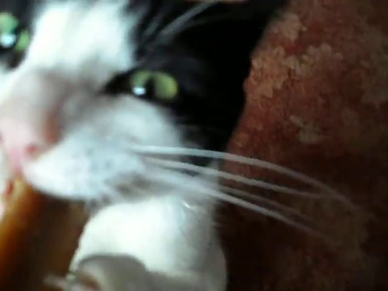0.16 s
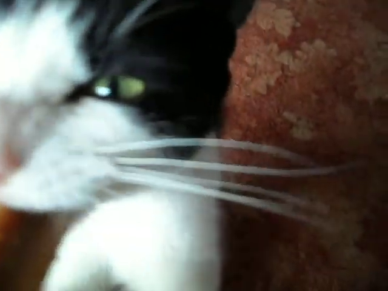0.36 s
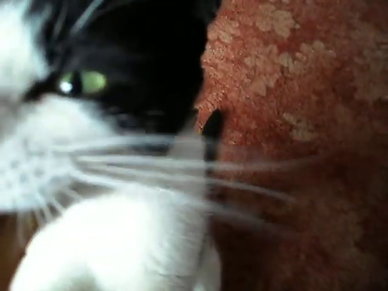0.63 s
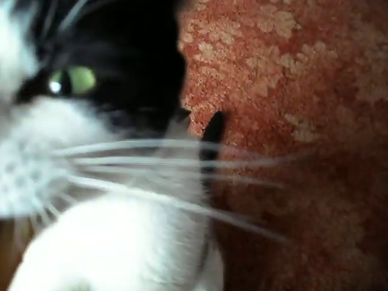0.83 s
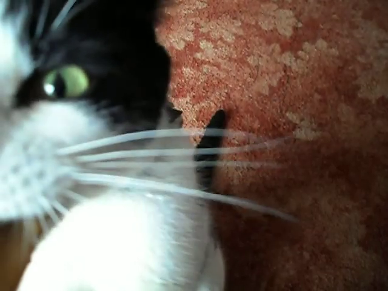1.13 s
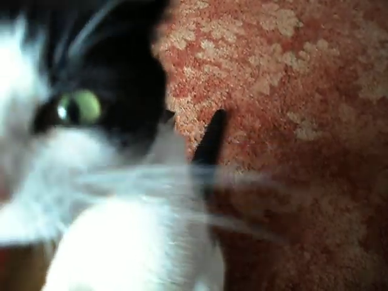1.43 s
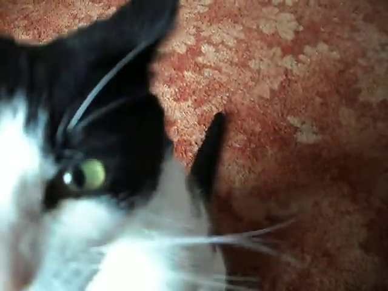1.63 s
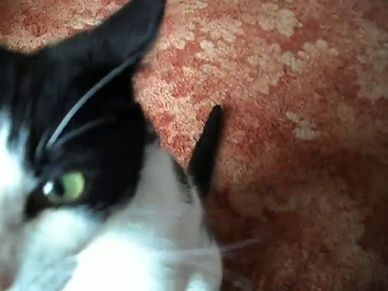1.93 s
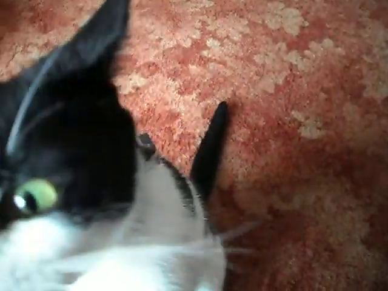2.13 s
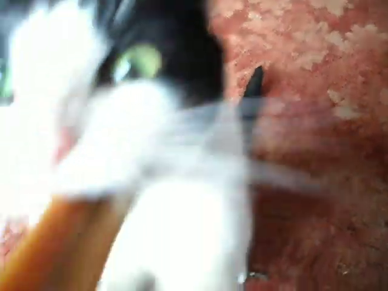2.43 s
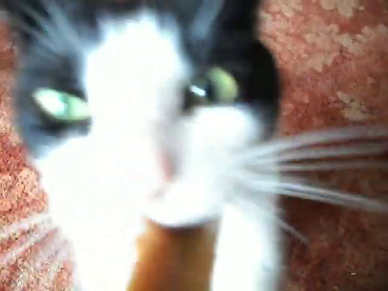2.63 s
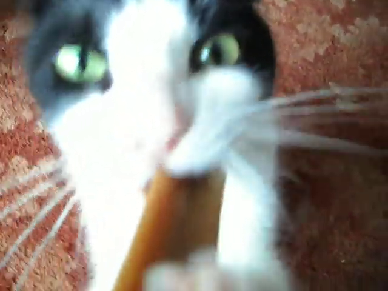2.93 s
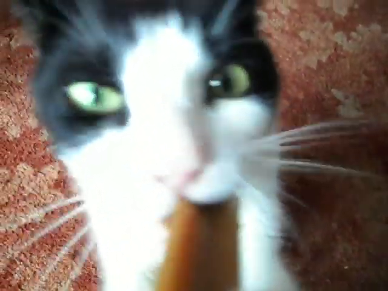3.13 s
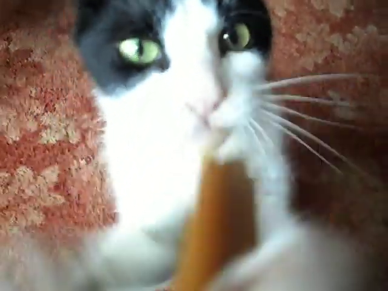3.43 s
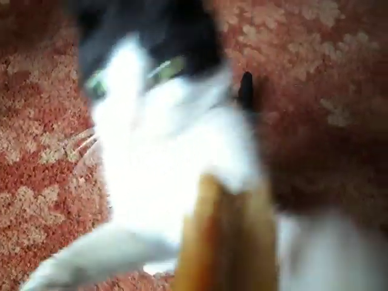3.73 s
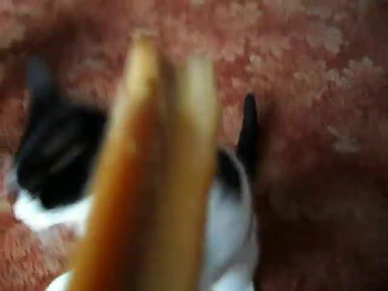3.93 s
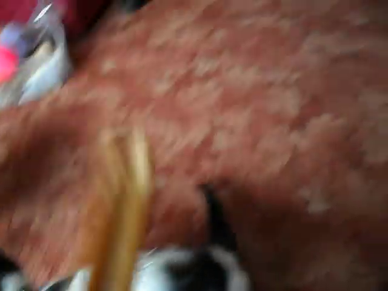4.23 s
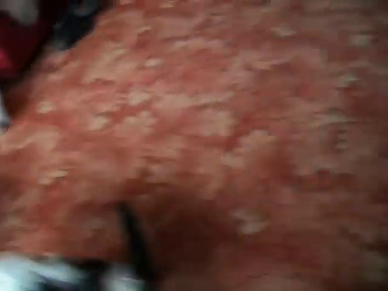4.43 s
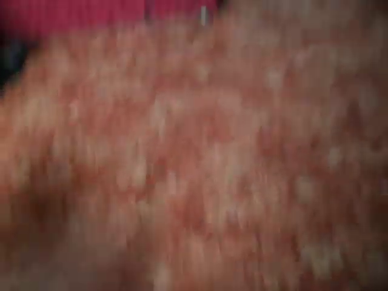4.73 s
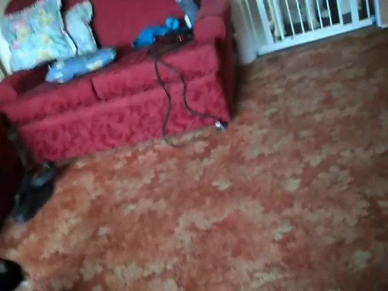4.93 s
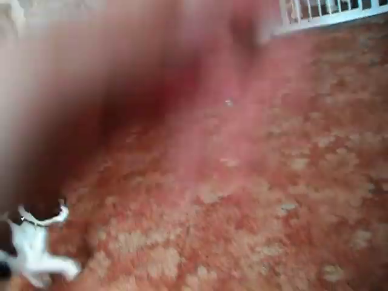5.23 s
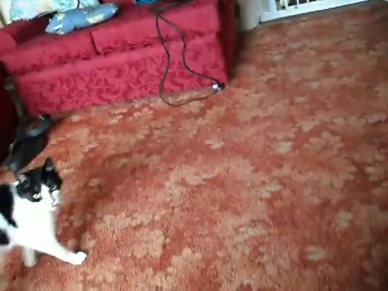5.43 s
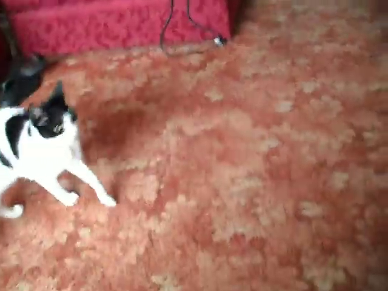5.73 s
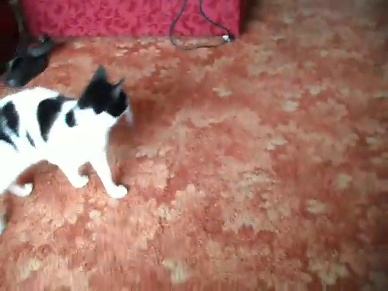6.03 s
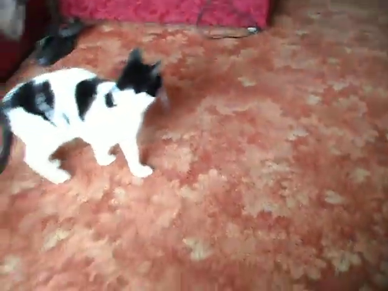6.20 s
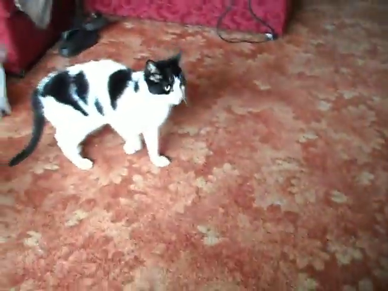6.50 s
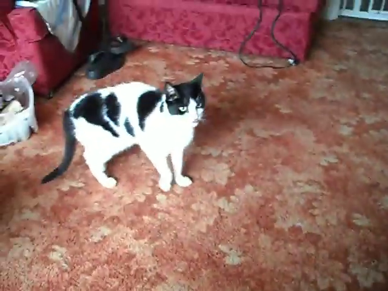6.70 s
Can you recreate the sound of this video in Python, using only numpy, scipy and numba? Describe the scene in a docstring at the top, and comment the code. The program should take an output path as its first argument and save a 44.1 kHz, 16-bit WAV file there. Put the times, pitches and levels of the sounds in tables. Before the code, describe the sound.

A rough, pulsing cat growl opens right at the microphone, ending in a brief higher catch and faint wet smacks. Knocks and tiny tooth ticks lead to a second, smoother growl, cut off by a single explosive yelp ringing in the small room. Afterwards there is hissy quiet, soft rubbing, a dropped chew and several loud, dry clicks.

```python
"""A pet growls low over a hard chew close to a camera in a room, then barks once: vocal-fold pulses
through chest, mouth and throat resonances. Teeth and claws tick as short rings; a tag, wet smacks and
the dropped chew ring as modes. Knocks, rubs, rustle and whistles are shaped noise.
The camera hisses, whines, buzzes at its frame rate, and turns its gain down after loud sounds."""
import sys
import numpy as np
from scipy import signal
from scipy.fft import rfft, irfft
from scipy.io import wavfile
from scipy.ndimage import uniform_filter1d
from numba import njit

SR = 44100
rng = np.random.default_rng(int(sys.argv[2]) if len(sys.argv) > 2 else 0)


def pcm_store(signal):
    """Save signal as 16-bit PCM."""
    levels = np.round(np.clip(np.atleast_2d(signal), -1, 1) * 32767)
    wavfile.write(sys.argv[1], SR, levels.astype(np.int16).T)


N = 302476
T = np.arange(N) / SR

# growls: (start [s], end [s], swell-in [s], resting pulse rate [Hz], chest level at rest [dB],
#   chest rise with push [dB/Hz], mouth ring at rest [dB], its fade [dB/s],
#   mouth resonance at start [Hz], upper throat [dB], throb [dB])
GROWLS = [(0, 0.737, .01, 86, -51, 0, -51.5, 4.5, 1013, -5, 9),
          (0.736, 0.776, .01, 164.9, -38.5, 2.5, -64, 0, 860, -6, 0),
          (1.702, 3.384, 0.14, 98.3, -49, 0.69, -55.5, 0, 898, 1, 3.5)]
# pulse rate, one list per growl: (time [s], rate [Hz])
GROWL_RATES = [
    [(0, 76.55), (.142, 81.9), (.3, 83.9), (.414, 81.8), (.508, 73.83), (.73, 80.3)],
    [(.727, 169), (.772, 156.3)],
    [(1.7, 97.8), (1.8, 100.6), (2.022, 97.4), (2.15, 111.7), (2.24, 114.3), (2.33, 107.9), (2.45, 96.4),
     (2.602, 107.2), (2.8, 93.36), (2.912, 112.8), (2.982, 103.2), (3.054, 98.5), (3.172, 107.4),
     (3.25, 99.96), (3.37, 96.6)],
]
# scatter of period, one per growl: (spread [natural log])
GROWL_ROUGHNESS = [.12, .05, .055]
# chest resonances: (centre [Hz], width [Hz], level [dB])
CHEST = [(112, 130, 7.5), (264, 320, -1)]
# upper throat: (centre [Hz], width [Hz], level re mouth ring [dB], share of the opening [1])
UPPER_THROAT = [(2120, 290, -10, 0.4), (3746, 160, -16.5, 0.45)]
# bark: (time [s], pitch [Hz], level [dB], first partial re level [dB])
BARK = [(3.374, 189.9, -54.5, -8), (3.388, 214.6, -32, -3), (3.402, 345, -25.5, 0), (3.425, 427, -18, 4),
        (3.437, 437.5, -6, 7), (3.45, 442, -15.5, -5), (3.468, 450, -12, -17.5), (3.49, 455, -15, 8),
        (3.503, 440, -27, 2), (3.525, 330, -29, -6), (3.555, 234.8, -31, -6.5), (3.6, 185, -34.5, 0),
        (3.65, 167.4, -56, 8)]
# bark resonances with the jaw open: (centre [Hz], width [Hz], level [dB])
BARK_THROAT = [(640, 90, -14), (878, 253, -1), (1230, 220, -8), (1720, 200, -15), (2200, 490, -18.5),
               (2510, 220, -18)]
# steady breath bands in the bark: (centre [Hz], width [Hz], level [dB])
BARK_BREATH = [(3700, 500, -32), (4870, 248, -32), (5670, 300, -27.5), (7430, 330, -27.5),
               (9300, 2000, -28)]
# knocks across the room: (time [s], treble peak [dB], bass, middle, top re treble [dB])
KNOCKS = [(1.189, -33, -1.5, -4, -2.5), (1.324, -36, -4, -5, -8), (1.4844, -42.5, -22, -8, 6),
          (1.596, -36.5, -13, -18, 3), (1.68, -48, -2, 6, 8.5), (1.8312, -34, -13, -2, -1),
          (1.8495, -36, -29, 6, 6), (2.405, -36, -14, -2.5, 5), (5.5646, -34, 1, 2, 11),
          (5.971, -44, 9.5, 8, 4.5)]
# knock bands, bass to top: (centre [Hz], width [Hz])
KNOCK_BANDS = [(860, 750), (2600, 5300), (5300, 3100), (9300, 5200)]
# close clicks: (time [s], peak [dB], main ring [Hz], second ring [Hz], its level [dB], rattle [dB])
CLICKS = [(3.27, -42, 2120, 4960, -10, -20), (3.3075, -31.5, 2170, 6200, -10, 0),
          (3.3593, -40.5, 2180, 6750, 0, -4), (6.2987, -18, 4000, 8800, -5, -3),
          (6.6144, -16, 4930, 2550, -18, -19), (6.6269, -6.5, 4700, 1670, -23.5, -33),
          (6.6613, -15, 3770, 2400, -3, -0.5), (6.8285, -1, 4630, 2760, -6.5, -20)]
# ticks of claws and nails: (time [s], peak [dB], ring [Hz])
TICKS = [(.023, -35, 8000), (.298, -46, 3500), (1.437, -38.5, 7500), (1.485, -34, 8500), (1.597, -28, 6040),
         (3.236, -28, 4500), (3.943, -32.5, 5760), (6.202, -27, 8300), (6.412, -28, 7400),
         (6.439, -29.5, 7560), (6.68, -38, 6500)]
# low thumps: (time [s], peak [dB])
THUMPS = [(.739, -31), (3.433, -23.5), (6.2977, -20)]
# rubbing of fur and fingers: (full from [s], held [s], level [dB], low band [Hz],
#   upper bands re level [dB], swell [dB/s], fade [dB/s])
RUBS = [(.43, .005, -66.5, 7000, 4, 397, 300), (.662, 0.024, -65, 5000, 4.5, 600, 150),
        (.865, 0.012, -54.5, 3240, 2.5, 120, 96), (.91, 0.035, -54.5, 950, -34, 198, 150),
        (3.0, 0.058, -54.5, 3000, 1, 400, 199), (5.582, 0.012, -54, 2920, 5, 600, 78),
        (5.99, 0.033, -58.5, 1220, 0, 500, 40), (6.2, 0.045, -48.5, 4100, 7, 174, 396),
        (6.26, 0.06, -48.5, 3930, -2, 300, 500), (6.365, 0.017, -53, 4400, 1, 297, 300)]
# rustle of the room and the moving hand: (time [s], level [dB])
RUSTLE = [(0, -52), (.9, -53), (1.47, -53.5), (2.27, -49), (3.4, -48), (3.7, -57), (4.5, -58), (4.65, -50),
          (5.5, -57), (6.0, -49.5), (6.5, -50), (6.57, -45), (6.65, -50), (6.86, -52)]
# rustle spectrum: (frequency [Hz], density [dB per Hz])
RUSTLE_COLOUR = [(40, 6.5), (100, 3.5), (200, 1.5), (400, -6.5), (800, -12.5), (1600, -20.5), (3500, -26.5),
                 (6000, -36)]
# camera hiss spectrum: (frequency [Hz], density [dB per Hz])
HISS_COLOUR = [(180, -32.5), (300, -5.5), (2740, -11.5), (3400, -12), (6760, -14.5), (7600, -12),
               (9600, -9.5), (10800, -10.5), (11600, -18), (12400, -24.5)]
# camera buzz: (multiple of frame rate [1], level [dB])
BUZZ = [(1, -46.5), (2, -59.5), (3, -71), (4, -63.5)]
# collar tag modes: (frequency [Hz], level [dB], T60 [s])
TAG = [(615, -11, 0.65), (1020, -4, 0.36), (1980, -6.5, 0.46), (2774, -1, 0.42), (3560, 1, 0.32),
       (3700, 2, .15), (4200, 0, 0.2), (4420, -2.5, 0.34), (5610, -3, .15), (6560, -4, 0.26),
       (9030, -3, 0.22), (10120, 11.5, 0.077)]
# modes of the chew dropped on the floor: (frequency [Hz], level [dB], T60 [s])
CHEW = [(242, -1, 0.31), (330, -13, 0.2), (634, -4, .22), (730, 3, 0.27), (1130, -8, 0.2), (1460, -10, 0.2),
        (2250, -14, .2), (3000, -16, 0.21)]
# wet smack modes: (frequency [Hz], level [dB], T60 [s])
SMACK = [(4900, -0.5, 0.26), (5100, -2, .2), (5560, -1, .2), (5700, -6, .15)]
# smacks: (time [s], level [dB])
SMACKS = [(.765, -49), (.837, -50)]
# whistles and squeaks: (start [s], length [s], pitch [Hz], glide [Hz/s], level [dB])
WHISTLES = [(0.635, 0.039, 3120, 0, -67), (0.683, .03, 3170, -1000, -65), (0.97, 0.036, 2450, 0, -58),
            (1.673, 0.092, 3250, -600, -65), (3.803, 0.097, 2260, 2500, -65),
            (3.797, 0.108, 873, 1499, -58), (4.291, .08, 3300, -1800, -61.5),
            (5.445, 0.13, 3290, -2500, -62.5), (6.687, 0.11, 2650, 1006, -63.5),
            (6.835, .03, 4470, -1.5, -60)]

MOUTH_WIDTH_HZ, MOUTH_LAG_S, MOUTH_DB_PER_HZ = 260., .0025, 0.44
MOUTH_SETTLE_HZ, MOUTH_SETTLE_S = 850, 1.0  # the resonance sinks as the jaw closes
OPENING_PER_HZ = .008  # resonances rise by this share per Hz of push
GROWL_WAVER_DB, MOUTH_WAVER_DB, THROAT_WAVER_DB = 1.0, .8, 2.0
STRONG_WEAK, PULSE_SCATTER_DB, THROAT_WANDER = .2, 2.0, .03
THROB_HZ, THROB_LEAD_TURNS = 19.9, 0.018
BARK_ROUGHNESS, OPEN_PITCH_HZ, OCTAVE_DB = .06, 425, -18
KNOCK_T60_S, KNOCK_CREST_DB = 0.28, 12  # noise peaks above rms
RING_RISE_S = 0.0052
TAG_S, TAG_DB, CHEW_S, CHEW_DB = 1.85, -43.5, 5.567, -32
TICK_WIDTH_HZ, TICK_RATTLE_DB = 2900, -16.5
CLICK_WIDTH_AT_4500_HZ, CLICK_WIDENING = 1330, 1  # width grows as this power of pitch
CLICK_TAIL_DB, CLICK_TAIL_T60_S = -18, .025
BODY_HZ, BODY_DB, BODY_T60_S = 905, -23, 0.012
THUMP_HZ, THUMP_T60_S = 119.9, 0.025
RUSTLE_FLICKER_DB, WHISTLE_WIDTH_HZ = 1.6, 125.
FRAME_HZ, BUZZ_WAVER_DB = 30, 2.2
HISS_DB, WHINE_HZ, WHINE_DB = -58.5, 7140, -68.5
ROOM_T60_S, ROOM_TOP_T60_S = 0.31, 0.24
TOP_HZ = 16500


def undb(db):
    """Gain of a level in dB."""
    return 10 ** (np.asarray(db) / 20)


def unit(x):
    """Scaled to rms 1."""
    return x / np.sqrt(np.mean(x ** 2))


def white():
    """White noise over the whole scene."""
    return rng.standard_normal(N)


def span(start_s, end_s):
    """Gate with soft edges."""
    return uniform_filter1d(1. * ((T >= start_s) & (T <= end_s)), 600)


def columns(rows):
    """Gate over a table's time span, and its columns at every sample."""
    time_s, *cols = np.transpose(rows)
    return span(time_s[0], time_s[-1]), [np.interp(T, time_s, c) for c in cols]


def walk(rate_hz):
    """Slow chance with spread 1."""
    k = int(SR / rate_hz)
    steps = np.repeat(rng.standard_normal(N // k + 1), k)
    return unit(uniform_filter1d(uniform_filter1d(steps, k), k)[:N])


def fade(start_s, t60_s):
    """Envelope from start_s, down 60 dB after t60_s."""
    return (T >= start_s) * np.exp(-np.log(1000) * np.clip(T - start_s, 0, 2) / max(t60_s, .001))


def coloured(points):
    """Noise with the spectrum of (Hz, dB) points, rms 1."""
    hz, db = np.transpose(points)
    f = np.maximum(np.arange(N // 2 + 1) * SR / N, 1)
    shape_db = np.interp(np.log(f), np.log(hz), db, left=-90, right=-90)
    return unit(irfft(rfft(white()) * undb(shape_db), N))


def band(x, hz, width_hz):
    """Fixed band-pass."""
    return signal.lfilter(*signal.iirpeak(hz, hz / max(width_hz, 1), SR), x)


def steep_band(x, hz, outer_hz, inner_hz):
    """Two fixed band-passes in series."""
    return band(band(x, hz, outer_hz), hz, inner_hz)


@njit
def svf(x, hz, width):
    """Band-pass with a moving centre, gain 1 at the centre."""
    y, b, l = np.empty(len(x)), 0., 0.
    for i in range(len(x)):
        g, k = np.tan(np.pi * hz[i] / SR), width / hz[i]
        v = (b + g * (x[i] + 1e-18 - l)) / (1 + g * (g + k))
        b, l, y[i] = 2 * v - b, l + 2 * g * v, k * v
    return y


def resonance(x, centre_hz, outer_hz, inner_hz):
    """Moving resonance of two band-passes, rms 1."""
    return unit(svf(svf(x, centre_hz, 1. * outer_hz), centre_hz, 1. * inner_hz))


@njit
def folds(hz, rough, chance):
    """A pulse each time the vocal folds snap shut; roughness scatters period and size."""
    pulses, p, k = np.zeros(len(hz) + 1), 0., 0
    for i in range(len(hz)):
        step = hz[i] * np.exp(rough[i] * chance[k, 0]) / SR
        p += step
        if p >= 1:
            p, k = p - 1, k + 1
            size = np.exp(1.5 * rough[i] * chance[k, 1])
            # split over two samples to place it between them
            pulses[i] -= size * p / step
            pulses[i + 1] -= size * (1 - p / step)
    return pulses[:-1]


def growls():
    """Uneven pulses thump the chest, then ring the mouth and throat; push quickens them."""
    out = 0
    for row, rates, rough in zip(GROWLS, GROWL_RATES, GROWL_ROUGHNESS):
        start_s, end_s, swell_s, rest_hz, chest_db, chest_slope = row[:6]
        mouth_db, mouth_fall, mouth_start_hz, upper_db, throb_db = row[6:]
        since_s = np.clip(T - start_s, 0, 2)
        hz = columns(rates)[1][0]
        push_hz = hz - rest_hz
        opening = OPENING_PER_HZ * push_hz
        pulses = folds(hz, np.full(N, rough), rng.standard_normal((2000, 2)))

        # every other pulse is weaker
        starts = (pulses < 0) & (np.roll(pulses, 1) == 0)
        alternation = 1 + STRONG_WEAK * (-1.) ** np.cumsum(starts)
        uneven = pulses * alternation * undb(PULSE_SCATTER_DB * walk(150))

        chest = sum(undb(db) * steep_band(source, f, 2 * w, w)
                    for (f, w, db), source in zip(CHEST, (pulses, uneven)))
        chest = unit(uniform_filter1d(chest, int(0.0017 * SR)))
        chest_level_db = chest_db + chest_slope * push_hz + GROWL_WAVER_DB * walk(8)

        # pulses build up in groups and drop back
        throb = (THROB_HZ * T - THROB_LEAD_TURNS + 0.13 * walk(6)) % 1
        sinking = (mouth_start_hz - MOUTH_SETTLE_HZ) * np.exp(-since_s / MOUTH_SETTLE_S)
        mouth_hz = (1 + opening) * (MOUTH_SETTLE_HZ + sinking)
        mouth = resonance(pulses * undb(throb_db * throb), mouth_hz, 600, MOUTH_WIDTH_HZ)
        for f, w, db, share in UPPER_THROAT:
            centre_hz = f * (1 + share * opening + THROAT_WANDER * walk(60))
            level_db = db + upper_db + THROAT_WAVER_DB * walk(20)
            mouth = mouth + undb(level_db) * resonance(uneven, centre_hz, 2 * w, w)
        mouth_level_db = mouth_db - mouth_fall * since_s + MOUTH_DB_PER_HZ * np.maximum(push_hz, 0)
        mouth_level_db = mouth_level_db + MOUTH_WAVER_DB * walk(12)
        swell = np.clip((T - start_s) / swell_s, .1, 1)
        mouth = swell * undb(mouth_level_db) * np.roll(mouth, int(MOUTH_LAG_S * SR))
        out = out + span(start_s, end_s) * (undb(chest_level_db) * chest - mouth)
    return out


def rustle():
    """Dull noise that swells and flickers."""
    level_db = columns(RUSTLE)[1][0] + RUSTLE_FLICKER_DB * walk(12)
    return undb(level_db) * coloured(RUSTLE_COLOUR)


def camera():
    """Buzz at frame-rate multiples, hiss pulsing once a frame, and a thin whine."""
    turn = 2 * np.pi * FRAME_HZ * T + 0.46 * walk(60)
    waver_db = BUZZ_WAVER_DB * walk(7)
    buzz = sum(undb(db + waver_db) * np.sqrt(2) * np.sin(k * turn + 1.2 * k) for k, db in BUZZ)
    hiss = undb(HISS_DB + 2.0 * np.sin(turn)) * coloured(HISS_COLOUR)
    whine = np.sin(2 * np.pi * WHINE_HZ * T) + 0.31 * unit(band(white(), WHINE_HZ, 150))
    return buzz + hiss + undb(WHINE_DB) * whine


def add(out, start_s, sound):
    """Mixes a short sound in at start_s."""
    k = int(start_s * SR)
    out[k:k + len(sound)] += sound[:N - k]


def snap(hz, width_hz, rattle_db, noise):
    """One ring that swells within a millisecond, a dull body and a brief rattle."""
    t = T[:len(noise)]
    swell = np.pi * width_hz * t * np.exp(1 - np.pi * width_hz * t)
    body = undb(BODY_DB) * np.sin(2 * np.pi * BODY_HZ * t) * 1000 ** (-t / BODY_T60_S)
    rattle = 3.24 * steep_band(noise * 1000 ** (-t / 0.012), hz, 1.8 * hz, hz / 2.0)
    return swell * np.sin(2 * np.pi * hz * t) + body + undb(rattle_db) * rattle


def clicks():
    """Thin ticks, harder clicks with a second, later ring, and dull low thumps."""
    out, t = np.zeros(N), T[:1500]
    for s, db, hz in TICKS:
        noise = rng.standard_normal(len(t))
        add(out, s, undb(db) * snap(hz, TICK_WIDTH_HZ, TICK_RATTLE_DB, noise))
    late = t / 0.00052 * np.exp(1 - t / 0.00055)
    late = late + undb(CLICK_TAIL_DB) * 1000 ** (-t / CLICK_TAIL_T60_S)
    for s, db, hz, second_hz, second_db, rattle_db in CLICKS:
        width_hz = CLICK_WIDTH_AT_4500_HZ * (hz / 4500) ** CLICK_WIDENING
        main = snap(hz, width_hz, rattle_db, rng.standard_normal(len(t)))
        second = undb(second_db) * late * np.sin(2 * np.pi * second_hz * t)
        add(out, s, undb(db) * (main + second))
    for s, db in THUMPS:
        add(out, s, undb(db) * np.sin(2 * np.pi * THUMP_HZ * t) * 1000 ** (-t / THUMP_T60_S))
    return out


def rubs():
    """Grainy friction noise in one movable and two upper bands; strokes swell, hold and fade."""
    grain = undb(2.0 * walk(400))
    high = unit(band(white(), 9600, 2200)) + 0.51 * unit(band(white(), 6800, 1400))
    high = unit(grain * high)
    out = 0
    for s, held_s, db, hz, top_db, swell, fall in RUBS:
        before_s, after_s = np.maximum(s - T, 0), np.maximum(T - s - held_s, 0)
        shape_db = db - swell * before_s - fall * after_s + 1.5 * walk(40)
        low = unit(grain * steep_band(white(), hz, 0.83 * hz, 0.55 * hz))
        out = out + undb(shape_db) * (low + undb(top_db) * high)
    return out


def whistles():
    """Breathy tones of narrow-band noise, some sliding."""
    out = 0
    for s, length_s, hz, glide, db in WHISTLES:
        pitch_hz = hz + glide * np.clip(T - s, 0, length_s)
        tone = unit(svf(white(), pitch_hz, WHISTLE_WIDTH_HZ))
        out = out + span(s, s + length_s) * undb(db + 1.6 * walk(60)) * tone
    return out


def ring(modes, start_s, db, width_hz):
    """A rattling object: each mode is shaken unevenly while it dies away."""
    shake = white()
    rise = np.clip((T - start_s) / RING_RISE_S, 0, 1)
    out = 0
    for f, mode_db, t60_s in modes:
        mode = unit(steep_band(shake, f, 3 * width_hz, width_hz))
        out = out + undb(mode_db) * mode * fade(start_s, t60_s) * rise
    return undb(db) * out


def knocks():
    """Distant blows: a crack and a noisy tail in four bands."""
    bass, middle, treble, top = (unit(steep_band(white(), f, w, w)) for f, w in KNOCK_BANDS)
    out = 0
    for s, db, bass_db, middle_db, top_db in KNOCKS:
        sound = treble + undb(bass_db) * bass + undb(middle_db) * middle + undb(top_db) * top
        envelope = fade(s, KNOCK_T60_S) + 0.13 * fade(s, 0.0067)
        out = out + undb(db - KNOCK_CREST_DB) * sound * envelope
    return out


def bark():
    """Fast pulses and breath puffs; the lowest resonances rise with pitch as the jaw opens."""
    gate, (hz, db, first_db) = columns(BARK)
    pulses = unit(folds(hz, np.full(N, BARK_ROUGHNESS), rng.standard_normal((4000, 2))))
    turn = 2 * np.pi * np.cumsum(hz * (1 + .015 * walk(100))) / SR
    first = np.sqrt(2) * undb(1.0 * walk(80)) * (np.sin(turn) + undb(OCTAVE_DB) * np.sin(2 * turn))
    puffs = uniform_filter1d(np.abs(pulses), 60) * undb(3 * walk(60)) * white()
    air = pulses + 0.48 * unit(puffs)
    jaw = np.clip(hz / OPEN_PITCH_HZ, .5, 1)
    throat = 0
    for k, (f, w, level_db) in enumerate(BARK_THROAT):
        formant = resonance(air, f * jaw ** (500 / f), 2 * w, w)
        throat = throat + (-1) ** k * undb(level_db) * formant
    breath = sum(undb(d + 4.4 * walk(30)) * unit(band(white(), f, w)) for f, w, d in BARK_BREATH)
    return gate * undb(db) * (throat + undb(first_db) * first + breath)


def room(x):
    """Scattered echoes; the treble dies sooner."""
    t = T[:SR]
    noise = rng.standard_normal((2, SR)) * (t > .004)
    low = signal.lfilter([.25], [1, -.75], noise[0]) * 1000 ** (-t / ROOM_T60_S)
    echo = low + 0.39 * noise[1] * 1000 ** (-t / ROOM_TOP_T60_S)
    return signal.fftconvolve(x, echo / np.sqrt(np.sum(echo ** 2)))[:N]


def scene():
    """Everything at the microphone; bark and rings send most to the room."""
    voice, loud = growls(), bark()
    rings = ring(TAG, TAG_S, TAG_DB, 83) + ring(CHEW, CHEW_S, CHEW_DB, 74)
    rings = rings + sum(ring(SMACK, s, db, 200) for s, db in SMACKS)
    wet = room(undb(-19) * voice + undb(-8.0) * loud + undb(-9.5) * rings)
    contacts = knocks() + clicks() + rubs()
    return (voice + loud + rings + wet + contacts + whistles() + rustle() + camera())[None]


@njit
def gain_db(x, top, slope, attack, hold, release_db):
    """Drops fast on loud sound, holds, then creeps back up."""
    out, g, wait = np.empty(len(x)), 0., 0.
    for i in range(len(x)):
        want = -slope * 20 * np.log10(max(abs(x[i]) / top, 1.))
        if want < g:
            g, wait = g + attack * (want - g), hold
        elif wait > 0:
            wait -= 1
        else:
            g = min(g + release_db, 0.)
        out[i] = g
    return out


def record(dry):
    """Gain control, two treble steps down, rounded clipping, and the cut at the top."""
    # hold 0.9 s, release 11 dB/s
    gain = gain_db(dry[0], 0.11, 0.49, 0.0063, .9 * SR, 11 / SR)
    loud = dry * undb(gain)
    step = signal.cheby2(10, 50, 11600, fs=SR, output="sos")
    edge = signal.cheby2(12, 50, 13200, fs=SR, output="sos")
    loud = signal.sosfiltfilt(edge, signal.sosfiltfilt(step, loud) + undb(-14) * loud)
    loud = loud / (1 + (loud / .76) ** 8) ** (1 / 8)
    return signal.sosfilt(signal.ellip(8, .2, 70, TOP_HZ, fs=SR, output="sos"), loud)


dry = scene()
out = record(dry)
pcm_store(out)
```